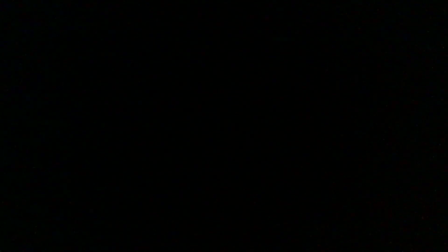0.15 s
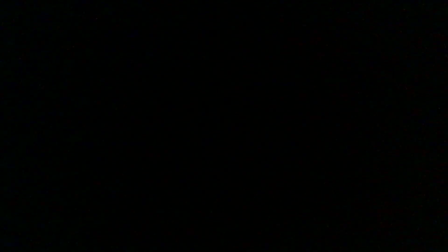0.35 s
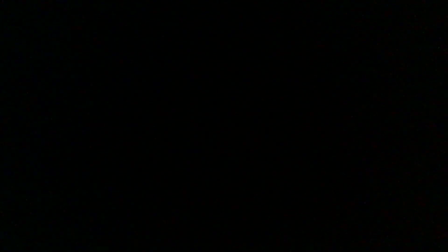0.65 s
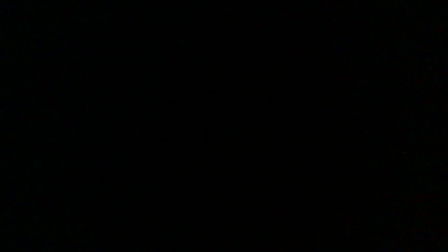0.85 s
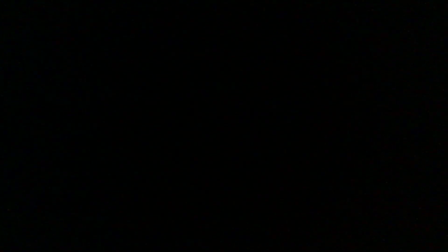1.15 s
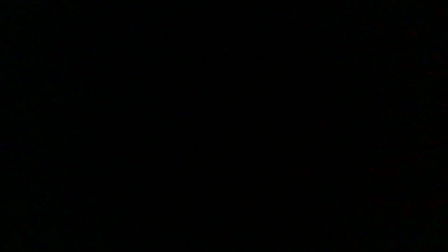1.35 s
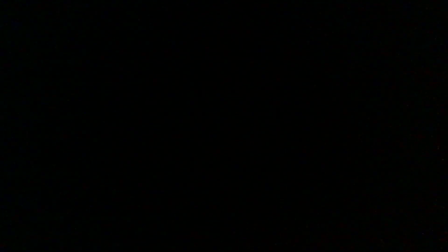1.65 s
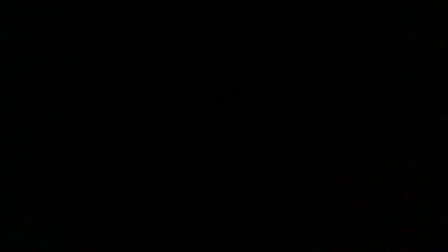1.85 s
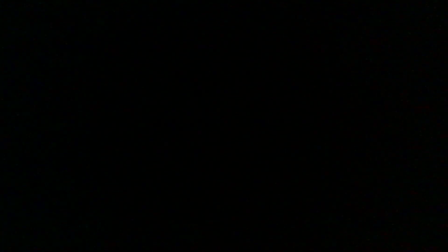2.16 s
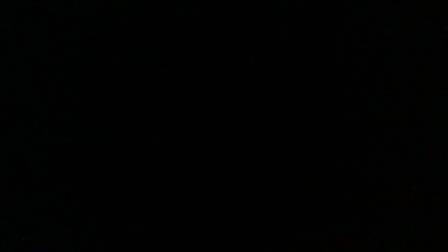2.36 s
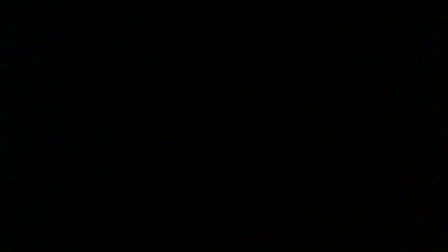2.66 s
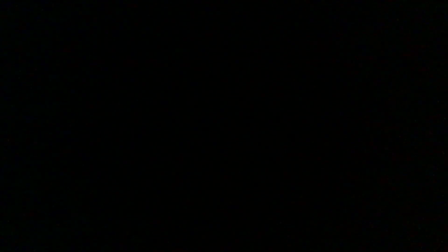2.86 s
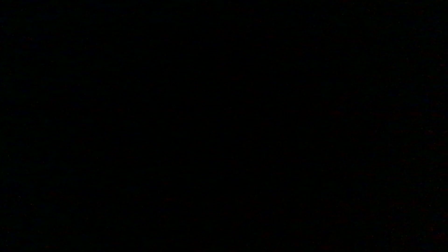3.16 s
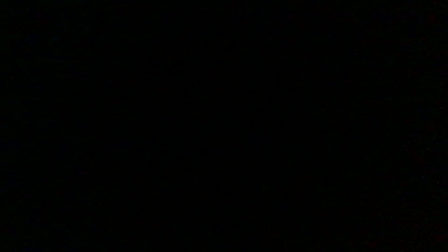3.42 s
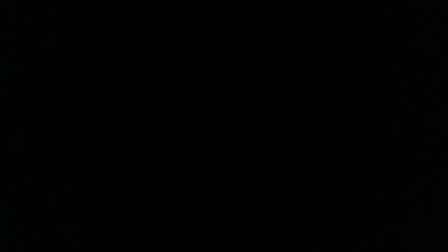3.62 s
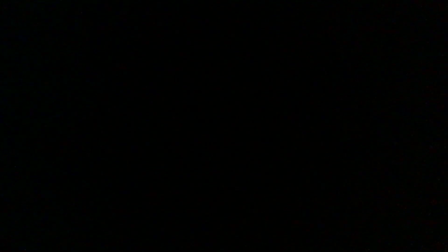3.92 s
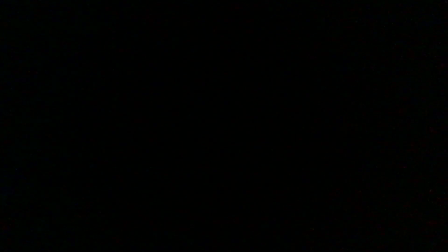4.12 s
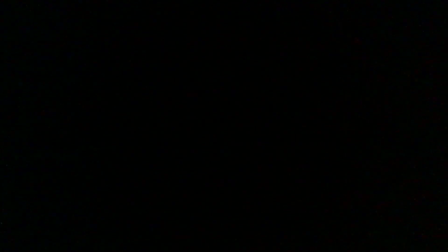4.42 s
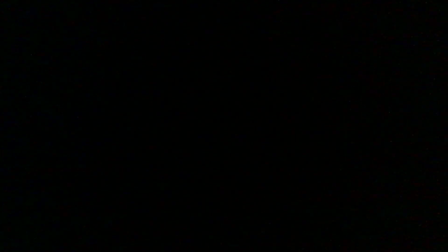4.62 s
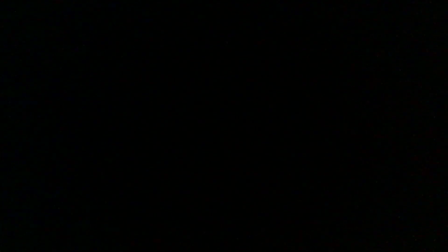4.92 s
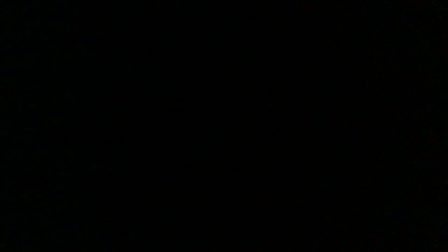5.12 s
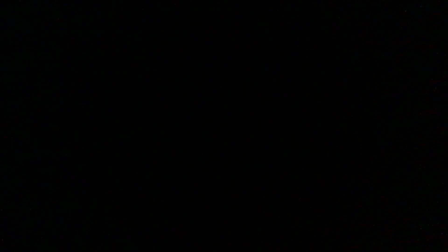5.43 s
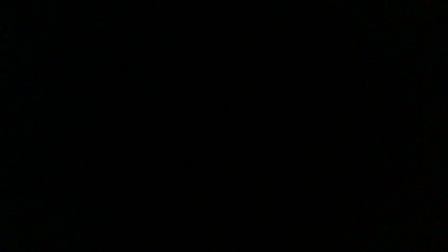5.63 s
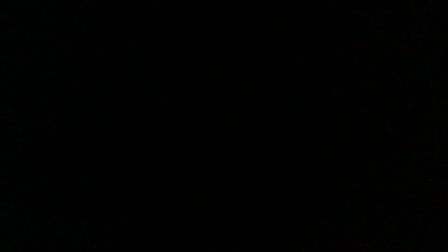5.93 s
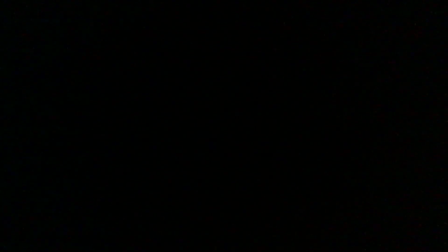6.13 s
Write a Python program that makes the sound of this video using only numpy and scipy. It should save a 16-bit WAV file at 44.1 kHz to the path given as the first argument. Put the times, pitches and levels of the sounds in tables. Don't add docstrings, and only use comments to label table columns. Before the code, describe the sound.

A small laptop fan whirs steadily up close while its plastic case is shoved, scraped and knocked against a desk in irregular bursts.

```python
import sys
import numpy as np
from scipy import signal
from scipy.fft import rfft, irfft, next_fast_len
from scipy.io import wavfile
from scipy.ndimage import uniform_filter1d, map_coordinates

SR = 44100
rng = np.random.default_rng(int(sys.argv[2]) if len(sys.argv) > 2 else 0)


def store_pcm(level_fs):
    pcm = np.round(np.clip(level_fs, -1, 1) * 32767).astype(np.int16)
    wavfile.write(sys.argv[1], SR, np.atleast_2d(pcm).T)


def field_ratio(decibels):
    return 10 ** (np.asarray(decibels, dtype=float) / 20)


N = 276948
T = np.arange(N) / SR

# time_s, air_db
FAN_LEVEL = [(0, -55.5), (.5, -53.5), (1.14, -52), (1.16, -59), (1.55, -56), (2.02, -54.5), (2.3, -58.5),
             (3.0, -58), (3.4, -55.5), (3.7, -54.5), (4.0, -55), (4.6, -51), (4.95, -51.5), (5.2, -49.5),
             (5.6, -47), (6.05, -50), (6.28, -47.5)]
# freq_hz, density_db
AIR_SPECTRUM = [(18, -51), (30, -37), (64, -7), (97, -10), (113, -2), (169, -3.5), (241, -6), (269, -11.5),
                (448, -10.5), (816, -21.5), (1330, -22), (2070, -28.5), (2360, -28), (6000, -51),
                (7800, -74), (13200, -120)]
# freq_hz, width_hz, level_db
GRILLE_MODES = [(1340, 134, -4), (2260, 170, -16), (4580, 420, 5)]
# freq_hz, level_db
VENT_SPECTRUM = [(3500, -13), (5500, -4), (7900, -8), (10000, -10.5), (13000, -16), (16000, -23)]
# freq_hz, level_db (over the air)
WHINE_LINES = [(1044, -19), (1626, -36), (4011, -32), (4479, -39), (4592, -32)]
# start_s, rise_s, hold_s, fall_s
HUM_PRESS = (4.86, .25, .15, .09)

# freq_hz, width_hz, level_db
PANEL_MODES = [(432.3, 50, -2.5), (527, 128, 0.5), (652, 316, -2.5), (826, 116, -3)]
# freq_hz, width_hz, level_db
DESK_MODES = [(76, 24, -4), (120, 27.6, -4), (160, 25.4, -0.5), (214, 50.6, -2), (286.5, 41, 0),
              (358, 71, -6)]
# freq_hz, width_hz, level_db
SHELL_MODES = [(1012, 157, 1), (1233, 195, 1.5), (1550, 403, -7), (2090, 213, -6), (2425, 217, -11.5),
               (3030, 410, -17), (3370, 390, -19), (4185, 300, -21.5), (5200, 870, -30.5)]
# freq_hz, level_db
HISS_SPECTRUM = [(3000, -8), (5000, -10.5), (6500, -4), (7900, -8), (9500, -7.5), (13000, -19),
                 (16000, -26)]

# start_s, speed_up_s, full_speed_s, slow_down_s, level_db
MUFFLED_STROKES = [
    (.12, 0.02, 0.01, 0.027, -40.5),
    (1.125, .012, .008, .01, -33),
    (2.385, .025, .015, .03, -37),
    (3.42, 0.06, .055, .08, -33),
    (4.24, 0.037, 0.0082, 0.041, -39.5),
    (5.41, 0.036, 0.014, .12, -37),
    (2.78, .03, .03, .04, -42),
    (5.83, .05, .025, .03, -34),
    (6.15, 0.066, 0.017, 0.046, -31.5),
]
PRESSED_STROKES = [
    (1.175, .045, .115, .017, -16.5),
    (1.85, 0.029, 0.12, 0.0081, -22.5),
    (2.405, .14, .135, .025, -18),
]
DRAGGING_STROKES = [
    (1.33, .015, .03, .125, -27.5),
    (4.62, .09, .09, .09, -34),
    (5.86, .08, .03, .013, -28),
]
LIGHT_STROKES = [
    (1.63, 0.088, 0.019, 0.3, -34.5),
    (3.075, 0.062, 0.039, 0.25, -33),
    (4.27, 0.14, 0.11, 0.087, -29),
    (5.53, 0.096, .01, 0.024, -38),
    (5.7, .055, 0.0061, .04, -38),
]
SCRAPING_STROKES = [
    (2.66, 0.023, 0.094, 0.11, -32.5),
    (3.75, 0.066, 0.038, 0.074, -29),
    (4.06, 0.057, 0.046, .09, -27.5),
    (2.58, .06, .04, .015, -27),
    (5.72, .022, .015, .008, -35),
]
BRUSHING_STROKES = [
    (3.38, 0.033, 0.053, .03, -53.5),
    (5.4, .02, 0.186, .02, -56),
    (6.08, 0.024, 0.1, 0.027, -57.5),
]
# panel_db, desk_db, shell_db, hiss_db
MUFFLED_MIX_DB, PRESSED_MIX_DB = (-6, 1, -18.5, -43), (0.5, -6, -7.5, -25.5)
DRAGGING_MIX_DB, LIGHT_MIX_DB = (-1, 2, -4, -31), (0, 0.5, -6.5, -28)
SCRAPING_MIX_DB, BRUSHING_MIX_DB = (-1, -1, -3.5, -27.5), (-1, -7, -0.5, -17.5)
SPEED_STEEPNESS = (0.93, 0.67, 1.1, 1.12)
# panel_db, desk_db, shell_db, hiss_db
MID_STROKE_DB = (1, 0.93, 2, 4.4)

# time_s, level_db
SEAM_TICKS = [
    (.1345, -39),
    (.230, -47),
    (3.71, -48),
    (6.098, -50),
    (1.446, -30.5),
]
# time_s, body_db
FOOT_BUMPS = [(.136, -35), (.282, -40), (.4, -27.5), (1.864, -16.5), (2.464, -24), (2.490, -15),
              (2.530, -11), (2.57, -8.5), (2.611, -8), (2.653, -13), (3.096, -34), (4.086, -32),
              (4.107, -19.5), (4.670, -30), (5.750, -31), (6.273, -26)]
# time_s, level_db, pitch_hz, ring_cycles
RINGING_THUDS = [(.165, -38, 180, 2.3), (.402, -25, 330, 4), (.4025, -13.5, 117, 6.1),
                 (0.451, -25.5, 242, 5.5), (1.145, -10.5, 90, 4.2), (1.147, -11.5, 197, 2.7),
                 (1.1448, -15, 380, 1.6), (1.152, -28, 760, 14), (1.154, -25, 450, 9),
                 (1.198, -19, 140, 2.5), (1.303, -19, 130, 3), (1.262, -18, 150, 3), (1.866, -15, 183, 3.8),
                 (1.992, -12, 2400, 12), (1.9937, -9, 696, 2.9), (1.996, -16, 300, 2.2),
                 (1.9999, -6, 147, 1.4), (2.0124, -26, 80, 3.9), (4.634, -27.5, 99, 7.9),
                 (5.4291, -22.5, 149, 12), (5.7562, -17, 322, 7.6), (6.205, -20.5, 1404, 9),
                 (6.2127, -13, 252, 5.9), (6.2137, -14.5, 103, 6), (6.2676, -19.5, 120, 3.2)]
# time_s, body_db, shell_ring_db, ring_hz, snap_db
HARD_KNOCKS = [
    (.450, -52, -36, 1120, -43),
    (1.1453, -2.5, -7, 1320, -13.5),
    (1.194, -10, -22, 1500, -30),
    (1.2541, -7, -23, 3970, -7),
    (1.328, -6.5, -12.5, 2070, -32),
    (1.9908, -12, -18, 1590, -7),
    (5.632, -22, -17, 2090, -60),
    (5.757, -31, -40, 2200, -40),
    (6.204, -32, -50, 2510, -25.5),
    (6.235, -45, -48, 2030, -33),
]
# freq_hz, level_db
BLOW_SPECTRUM = [(120, -30), (250, -12.5), (500, 12.5), (900, 0), (1500, -15), (3000, -80.5)]
# freq_hz, level_db
SNAP_SPECTRUM = [(1000, -4), (2500, 10.5), (4500, -4), (7500, -10), (12000, -23), (16000, -33)]
# pitch_hz, level_db, ring_cycles
LID_MODES = [(185, -16, 7), (340, -20, 4), (560, -17, 4), (740, -18, 9), (955, -18, 13), (1540, -15, 11),
             (1900, -19, 12), (3350, -28, 18), (4350, -37, 22)]

LEAD, SPAN = 256, 8192
HARD_TURNS, SOFT_TURNS = 1.249, 1.553


def unit(x):
    return x / np.sqrt(np.mean(x ** 2) + 1e-20)


def along(points, hz):
    f, v = np.transpose(points)
    return field_ratio(np.interp(np.log(hz + 1), np.log(f + 1), v))


def modes(table, f):
    total = 0
    for k, (centre, width, db) in enumerate(table):
        damping = 1j * f * width
        total = total + (-1) ** k * field_ratio(db) * damping / (centre * centre - f * f + damping)
    return total


def curves(rows):
    s, *cols = np.transpose(rows)
    return np.array([np.interp(T, s, c) for c in cols])


def wobble(rate):
    return map_coordinates(rng.standard_normal(int(N * rate / SR) + 4), [T * rate])


def filtered(x, response):
    m = next_fast_len(len(x) + 8192)
    return irfft(rfft(x, m) * response(np.fft.rfftfreq(m, 1 / SR)), m)[:len(x)]


def patchy(depth_db):
    z = signal.stft(rng.standard_normal(N + 512), nperseg=512)[2]
    field = uniform_filter1d(rng.standard_normal(z.shape), size=5, axis=0)
    field = uniform_filter1d(field, size=8, axis=1)
    return signal.istft(z * field_ratio(depth_db * unit(field)), nperseg=512)[1][:N]


def speed(start, rise, hold, fall):
    end = start + rise + hold + fall
    return np.clip(np.minimum((T - start) / rise, (end - T) / fall), 0, 1)


def fan():
    air_db, = curves(FAN_LEVEL)
    air = filtered(patchy(depth_db=1.1),
                   lambda hz: along(AIR_SPECTRUM, hz) * (1 + np.abs(modes(GRILLE_MODES, hz))))
    midband = filtered(air, lambda hz: (hz > 800) & (hz < 6000))
    air = air / np.std(midband) * field_ratio(0.49 * wobble(12))
    duct = unit(filtered(patchy(depth_db=2.5), lambda hz: modes([(464, 87, 0)], hz) ** 2))
    duct_db = -1 + 3 * speed(*HUM_PRESS)
    vent = unit(filtered(rng.standard_normal(N), lambda hz: along(VENT_SPECTRUM, hz)))
    whine = np.zeros(N)
    for hz, db in WHINE_LINES:
        level = field_ratio(db + 7.0 + 2.2 * wobble(3.4))
        whine += level * np.sin(2 * np.pi * hz * T + 1.6 * wobble(6.1))
    return field_ratio(air_db) * (air + whine + field_ratio(duct_db) * duct + field_ratio(-20) * vent)


def grit(rate, spread_db):
    caught = rng.random(N) < rate / SR
    size_db = spread_db * np.minimum(rng.exponential(size=N), 2)
    return unit(caught * rng.standard_normal(N) * field_ratio(size_db))


def stroking():
    rest_db, curve = 34, 1.36
    gain = np.zeros((4, N))
    for strokes, mix_db in ((MUFFLED_STROKES, MUFFLED_MIX_DB), (PRESSED_STROKES, PRESSED_MIX_DB),
                            (DRAGGING_STROKES, DRAGGING_MIX_DB), (LIGHT_STROKES, LIGHT_MIX_DB),
                            (SCRAPING_STROKES, SCRAPING_MIX_DB), (BRUSHING_STROKES, BRUSHING_MIX_DB)):
        for *times, db in strokes:
            v = speed(*times)
            crown = np.sin(np.pi * np.clip((T - times[0]) / sum(times[1:]), 0, 1))
            shape_db = np.outer(MID_STROKE_DB, crown - 1)
            shape_db = shape_db - np.outer(SPEED_STEEPNESS, rest_db * (1 - v) ** curve)
            gain += np.minimum(10 * v, 1) * field_ratio(db + np.c_[mix_db].T + shape_db)
    return gain


def slide():
    gain = stroking()
    flutter = wobble(60)
    rough = grit(rate=4000, spread_db=0.9) + 0.92 * unit(patchy(depth_db=2.5))
    fine = grit(rate=14000, spread_db=3) + 1.5 * unit(patchy(depth_db=3))
    panel = filtered(rough, lambda hz: modes(PANEL_MODES, hz) / (1 + (hz / 1100) ** 4))
    desk = filtered(patchy(depth_db=2.5),
                    lambda hz: modes(DESK_MODES, hz) * hz ** 4 / (hz ** 4 + 65 ** 4))
    shell = filtered(rough, lambda hz: modes(SHELL_MODES, hz) * hz ** 2 / (hz ** 2 + 750 ** 2))
    hiss = filtered(fine, lambda hz: along(HISS_SPECTRUM, hz))
    layers = (field_ratio(2.0 * flutter) * panel, field_ratio(1.27 * flutter) * desk, field_ratio(1.8 * flutter) * shell,
              field_ratio(0.37 * flutter + 1.5 * wobble(35)) * hiss)
    return sum(g * unit(x) for g, x in zip(gain, layers))


def travel(hz, turns):
    return np.exp(-2j * np.pi * turns * np.log(1 + hz / 40))


def push():
    return 1. * (np.arange(SPAN) == 0)


def blow():
    t = np.arange(SPAN) / SR
    return push() + .1 * field_ratio(-60 * t / .008) * rng.standard_normal(SPAN)


def body(hz):
    return along(BLOW_SPECTRUM, hz) * (1 + .5 * modes(PANEL_MODES, hz))


def shell_ring(hz, ring_hz):
    return modes([(ring_hz, 350, 0)], hz) / (1 + (hz / ring_hz / 1.4) ** 4)


def add(out, s, db, force, response):
    x = filtered(np.roll(force, LEAD), response)
    out[round(s * SR) - LEAD:][:SPAN] += field_ratio(db) * x / np.abs(x).max()


def add_mode(out, s, db, pitch_hz, cycles, turns):
    mode = [(pitch_hz, pitch_hz / cycles, 0)]
    add(out, s, db, push(),
        lambda hz: modes(mode, hz) * travel(hz, turns) / (1 + (hz / pitch_hz / 1.8) ** 4))


def seam_ticks():
    out = np.zeros(N + SR)
    for s, db in SEAM_TICKS:
        add(out, s, db, blow(), lambda hz: along(SNAP_SPECTRUM, hz) * (hz / (hz + 6000)) ** 2
            * travel(hz, HARD_TURNS))
    return out[:N]


def foot_bumps():
    out = np.zeros(N + SR)
    for s, db in FOOT_BUMPS:
        force = blow()
        add(out, s, db, force, lambda hz: body(hz) * travel(hz, SOFT_TURNS))
        add(out, s, db - 14.5, force, lambda hz: shell_ring(hz, 1030) * travel(hz, SOFT_TURNS))
    return out[:N]


def thuds():
    out = np.zeros(N + SR)
    for s, db, pitch_hz, cycles in RINGING_THUDS:
        add_mode(out, s, db, pitch_hz, cycles, turns=1.396)
    return out[:N]


def hard_knocks():
    out = np.zeros(N + SR)
    for s, body_db, ring_db, ring_hz, snap_db in HARD_KNOCKS:
        force = blow()
        add(out, s, body_db, force, lambda hz: body(hz) * travel(hz, HARD_TURNS))
        add(out, s, ring_db, force, lambda hz: shell_ring(hz, ring_hz) * travel(hz, HARD_TURNS))
        add(out, s, snap_db, force, lambda hz: along(SNAP_SPECTRUM, hz) * travel(hz, HARD_TURNS))
    return out[:N]


def hum():
    press = speed(*HUM_PRESS)
    swell = field_ratio(-17 * (1 - press) + .8 * wobble(24.9)) * np.minimum(8 * press, 1)
    pitch_hz = 118 + 3 * press
    return field_ratio(-33) * swell * np.sin(2 * np.pi * np.cumsum(pitch_hz) / SR)


def lid_knock():
    out = np.zeros(N + SR)
    for pitch_hz, db, cycles in LID_MODES:
        add_mode(out, 5.632, db, pitch_hz, cycles, turns=2.05)
    return out[:N]


def scene():
    blows = seam_ticks() + foot_bumps() + thuds() + hard_knocks() + lid_knock()
    return (fan() + slide() + blows + hum())[None]


def band_limit(x):
    return signal.sosfilt(signal.butter(12, 16500, fs=SR, output="sos"), x)


def record(dry):
    def colour(hz):
        treble_lift = field_ratio(7 * (hz > 7950))
        bass_cut = (1j * hz / (1j * hz + 35)) ** 2
        return treble_lift * bass_cut

    x = filtered(dry[0], colour)
    x = x / (1 + np.abs(x / .7) ** 4) ** (1 / 4)
    mix = filtered(x, lambda hz: hz < 15750)[None]
    return band_limit(mix)


dry = scene()
out = record(dry)
store_pcm(out)
```